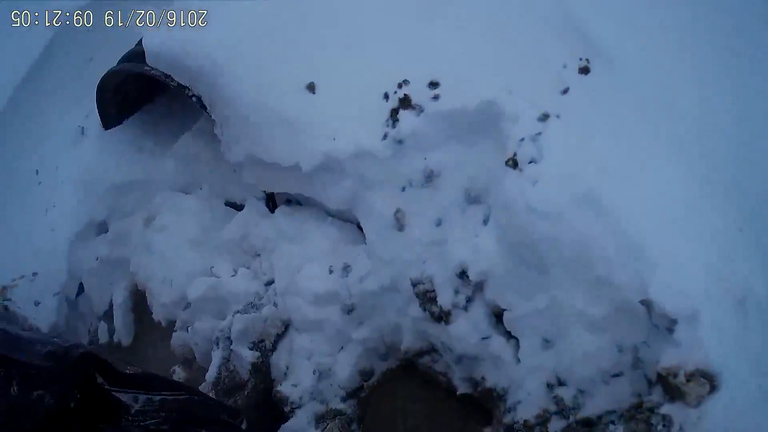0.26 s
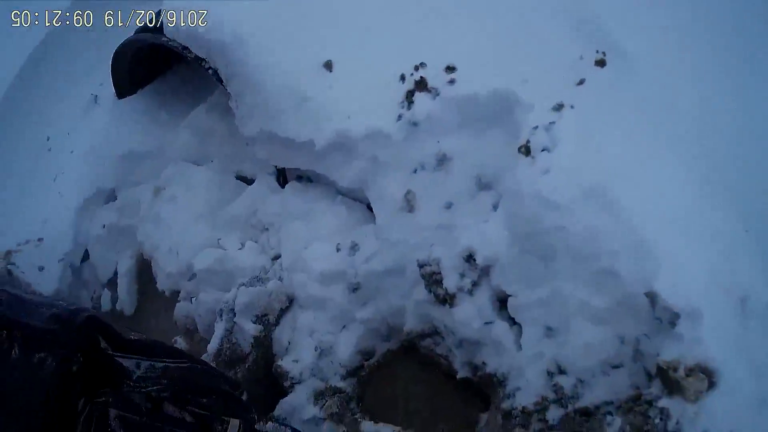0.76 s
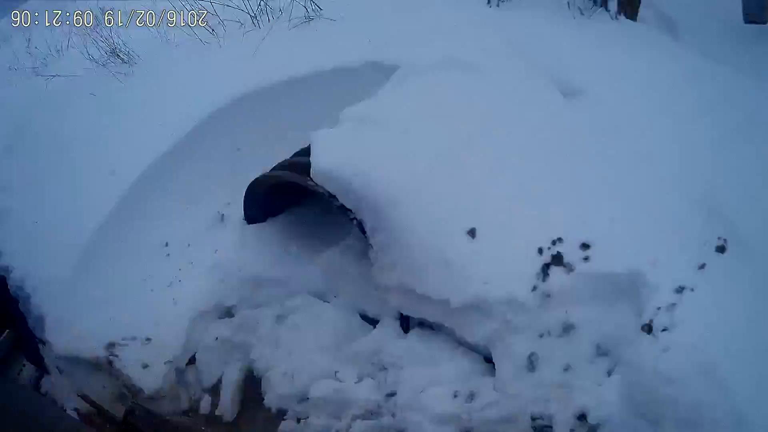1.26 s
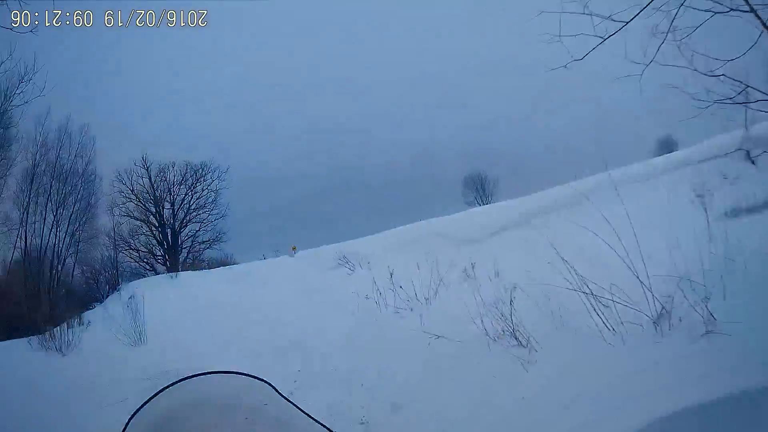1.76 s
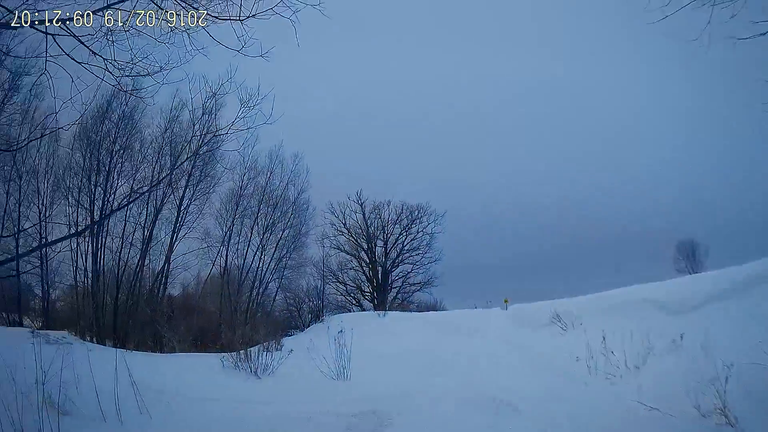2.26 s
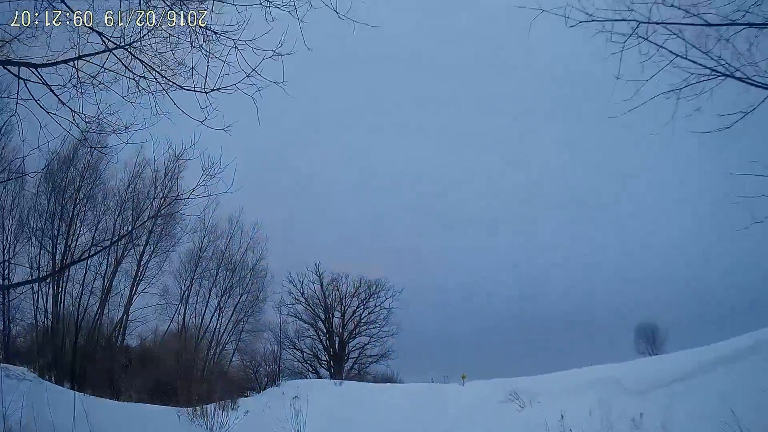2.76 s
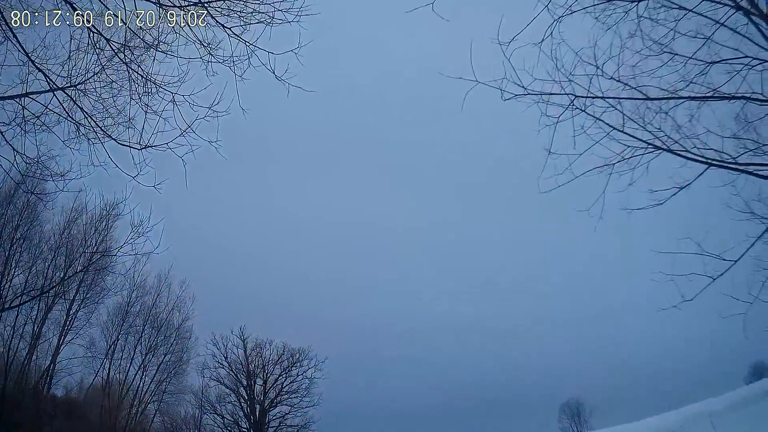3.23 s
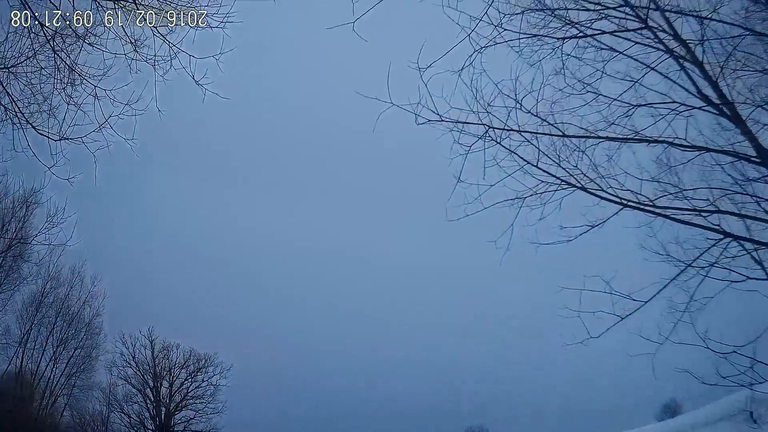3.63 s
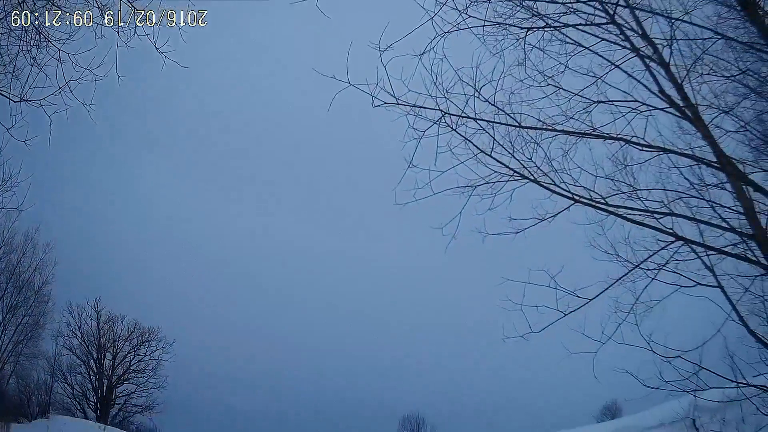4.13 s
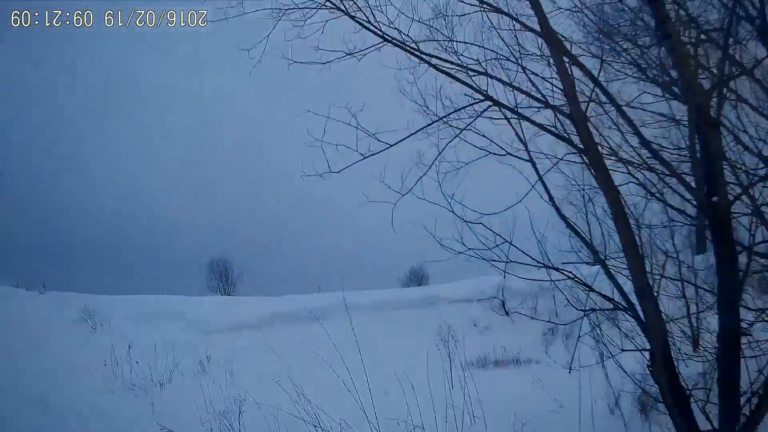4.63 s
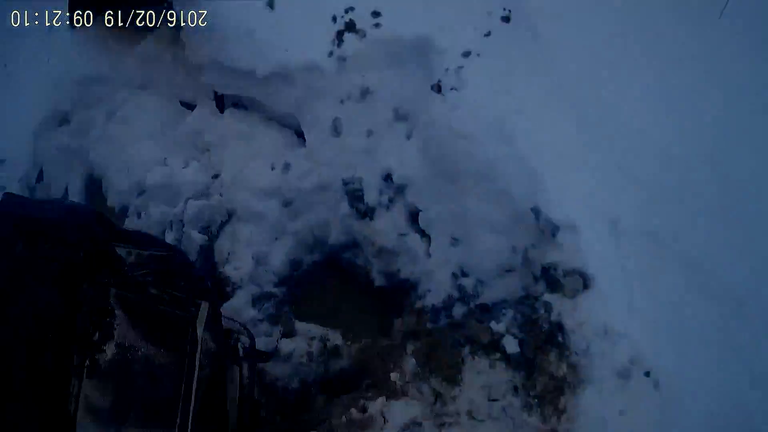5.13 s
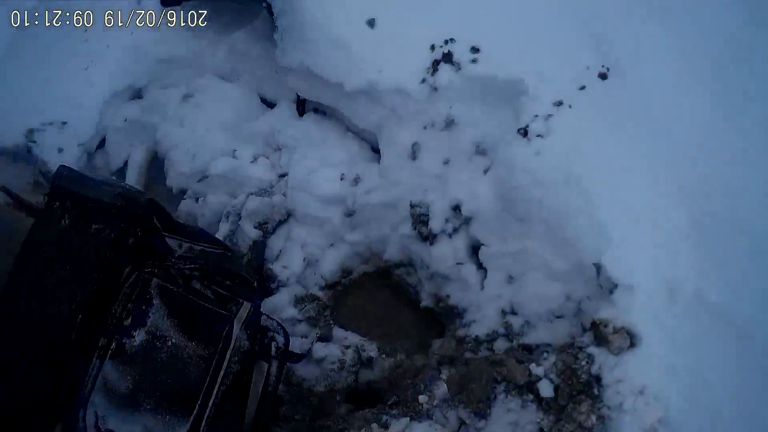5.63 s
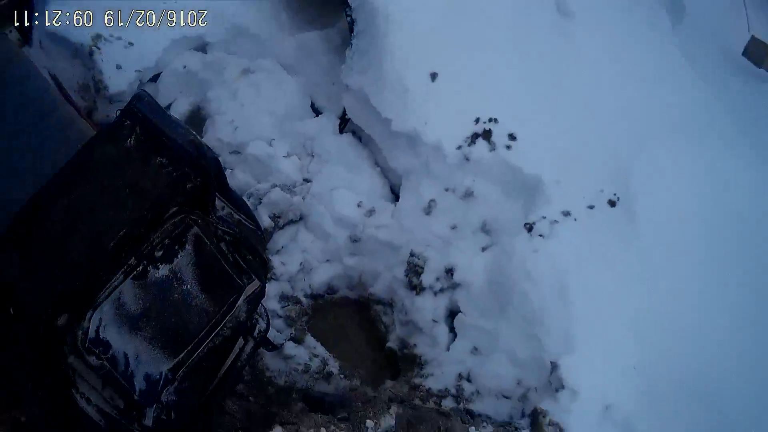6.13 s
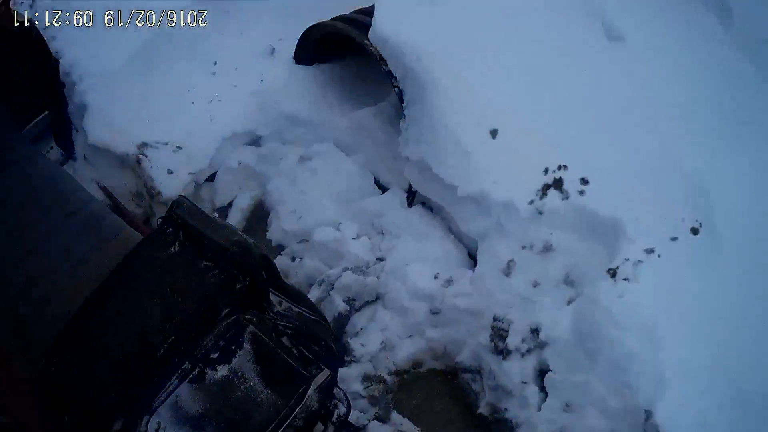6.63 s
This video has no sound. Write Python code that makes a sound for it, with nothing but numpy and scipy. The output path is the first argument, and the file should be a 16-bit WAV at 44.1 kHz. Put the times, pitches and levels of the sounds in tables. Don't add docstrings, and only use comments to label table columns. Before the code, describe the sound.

A close, hollow-sounding microphone in a plastic case catches a small engine's irregular putter: droning exhaust, clustered firings, hissing puffs and buzzing loose parts. A tiny squeak and light pings come first. In the last two seconds, boots and hands crush and scrape snow right nearby, crust crackling, case thumping and one lump of ice striking hard plastic, while the idle continues.

```python
import sys
import numpy as np
from scipy import signal
from scipy.io import wavfile
from scipy.ndimage import uniform_filter1d

SR = 44100
rng = np.random.default_rng(int(sys.argv[2]) if len(sys.argv) > 2 else 0)


def generate_wav(sig):
    pcm = np.round(np.clip(np.atleast_2d(sig).T, -1, 1) * 32767).astype(np.int16)
    wavfile.write(sys.argv[1], SR, pcm)


def how_loud(loudness_db):
    steps = np.asarray(loudness_db, float) / 20
    return 10 ** steps


N = 303849


def evened(x):
    return x / np.sqrt(np.mean(x ** 2) + 1e-20)


def curves(rows, outside=None):
    s, *columns = np.transpose(rows)
    return [np.interp(np.arange(N) / SR, s, column, outside, outside) for column in columns]


def add(mix, s, sound):
    part = mix[max(round(s * SR), 0):][:len(sound)]
    part += sound[:len(part)]


def band_of(x, low_hz, high_hz, order=2):
    return signal.sosfilt(signal.butter(order, (low_hz, high_hz), "band", fs=SR, output="sos"), x)


def around(x, hz, width_hz):
    return evened(band_of(x, hz - width_hz / 2, hz + width_hz / 2))


def boost_db(hz, resonances):
    return sum(db / (1 + (2 * (hz - at) / width) ** 2) for at, width, db in resonances)


# pitch_hz, width_hz, boost_db
CASE_RINGS = [(492.6, 32, 12.5), (931, 47, 12), (1080, 55, 2.5), (1123, 30, 4.5), (1278, 120, -7),
              (2380, 100, -1), (1437, 35, 8), (2200, 316, 7.5), (2830, 160, 9), (3060, 198, 6),
              (5900, 91, 2), (6850, 450, 10.5), (7240, 240, 5), (7360, 130, 5), (8440, 180, 8.5),
              (9580, 270, 12)]


def coloured(x, points, case_share):
    hz = abs(np.fft.fftfreq(8192, 1 / SR))
    f, level_db = np.transpose(points)
    gain_db = np.interp(np.log(hz + 1), np.log(f), level_db, -90, -90)
    gain_db += case_share * boost_db(hz, CASE_RINGS)
    log_gain = np.log(how_loud(np.maximum(gain_db, -90)))
    response = np.fft.ifft(np.exp(np.conj(signal.hilbert(log_gain)))).real[:4096]
    return evened(signal.oaconvolve(x, response)[:N])


def grit(per_s, spread_db):
    size = how_loud(spread_db * np.minimum(rng.exponential(1, N), 4)) * rng.standard_normal(N)
    return evened(size * (rng.random(N) < per_s / SR))


def wander(width):
    return evened(uniform_filter1d(uniform_filter1d(rng.standard_normal(N), width), width))


def patchy(spread_db, width):
    return how_loud(spread_db * wander(width))


def drift(x, spread_db):
    z = signal.stft(x, SR, nperseg=512)[2]
    noise = rng.standard_normal(z.T.shape)
    patches = uniform_filter1d(uniform_filter1d(noise, size=50, axis=0), size=5, axis=1)
    return signal.istft(z * how_loud(spread_db * evened(patches).T), SR, nperseg=512)[1][:N]


# first_s, last_s, catches, bark_db
RUNS = [(.057, .139, 3, -40), (.182, .268, 2, -40), (.313, .36, 2, -44), (.47, .558, 3, -39),
        (.642, .832, 5, -42), (.891, .97, 2, -43), (1.058, 1.101, 2, -38), (1.147, 1.147, 1, -44),
        (1.184, 1.275, 3, -39), (1.322, 1.322, 1, -42), (1.449, 1.535, 2, -42), (1.581, 1.581, 1, -43),
        (1.662, 1.708, 2, -42), (1.787, 1.834, 2, -43), (1.912, 1.912, 1, -40), (2.044, 2.132, 3, -42),
        (2.195, 2.195, 1, -47), (2.28, 2.386, 2, -44), (2.434, 2.475, 2, -48), (2.575, 2.674, 2, -45),
        (2.753, 2.801, 2, -45), (2.87, 2.87, 1, -47), (2.918, 2.918, 1, -41), (2.994, 3.064, 2, -45),
        (3.112, 3.206, 2, -44.5), (3.254, 3.254, 1, -47), (3.373, 3.477, 2, -44), (3.578, 3.657, 2, -46),
        (3.8, 4.045, 3, -46), (3.844, 3.844, 1, -49), (4.12, 4.209, 3, -49), (4.294, 4.294, 1, -45),
        (4.381, 4.475, 3, -46.5), (4.551, 4.643, 2, -46), (4.687, 4.687, 1, -44), (4.851, 4.95, 3, -39),
        (5.003, 5.048, 2, -36.5), (5.13, 5.262, 4, -37), (5.351, 5.351, 1, -37), (5.447, 5.553, 2, -39),
        (5.645, 5.737, 3, -37.5), (5.784, 5.784, 1, -34), (5.867, 5.867, 1, -37), (5.929, 5.929, 1, -35),
        (6.034, 6.034, 1, -34), (6.116, 6.198, 2, -35), (6.275, 6.275, 1, -40), (6.327, 6.471, 4, -38),
        (6.568, 6.568, 1, -39), (6.635, 6.717, 2, -33), (6.76, 6.76, 1, -39), (6.801, 6.844, 2, -35)]
# time_s, pitch_hz, level_db
DRONE = [(0.0, 93.6, -46), (0.4, 96.3, -47.5), (1.11, 96.4, -46), (1.48, 95.4, -46.5), (1.65, 93.1, -45.5),
         (2.05, 94, -46.5), (2.88, 93.3, -46.5), (3.3, 95.9, -46.5), (3.49, 95.1, -47), (4.03, 95.2, -48.5),
         (4.22, 96.4, -48), (4.85, 98, -49.5), (5.03, 97.1, -42), (5.22, 96.2, -45.5), (5.55, 93.65, -46),
         (5.89, 92.8, -42), (6.5, 93.3, -44), (6.89, 91.6, -40)]
# time_s, clatter_db, turned_away (0-1)
HEAD = [(0, -54.5, 0.3), (.38, -53.5, 0.07), (.88, -55, 0), (1.17, -51.5, 0), (1.5, -52, 0.1),
        (1.76, -49, 0.34), (2.15, -50, 0.7), (2.57, -52, 0.69), (2.9, -50, .8), (3.45, -50, 0.8),
        (3.86, -52.5, 0.7), (4.32, -51.5, 0.66), (4.78, -51.5, 0.07), (5.2, -45.5, 0.2), (5.5, -55, 0),
        (5.9, -42.5, 0.29), (6.35, -47.5, 0.55), (6.89, -44, 0)]


def firings():
    after_s, after_db = 0.041, -24
    run_fade_db = -0.63
    bark = np.zeros(N)
    shape = np.sin(np.pi * np.linspace(0, 1, round(.038 * SR)) ** 1.3) ** 2
    for first, last, catches, db in RUNS:
        starts = np.linspace(first, last, round(catches)) - np.argmax(shape) / SR
        for k, s in enumerate(starts):
            catch_db = db + run_fade_db * k
            add(bark, s, how_loud(catch_db) * shape)
            add(bark, s + after_s, how_loud(catch_db + after_db) * shape)
    drone_db, away = curves(DRONE)[1], curves(HEAD)[1]
    return bark, np.tanh(bark / how_loud(drone_db + 5 - 8 * away))


def drone_phase():
    return 2 * np.pi * np.cumsum(curves(DRONE)[0]) / SR


# time_s, share (0-1)
CHOKE_SHARE = [(0, 0.75), (.5, .75), (1.1, 0.58), (1.65, 0.6), (2.1, 0.72), (2.9, 0.52), (3.4, 1),
               (4.05, 0.98), (4.6, 1), (5.2, 0.57), (5.6, 0.64), (6.0, 0.46), (6.89, 0.9)]
# pitch_hz, level_db
RUMBLE = [(15, -24), (30, 0), (45, -5), (75, -1), (120, -18), (160, -9), (220, -11), (270, -15), (330, -21),
          (700, -40)]


def exhaust(bark, catch):
    turn, drone_db, away = drone_phase(), curves(DRONE)[1], curves(HEAD)[1]
    wobble = wander(1500)
    loose = .2 * wobble
    choke = signal.lfilter([.0015], [1, -.9985], catch ** 2)
    choke = np.roll(choke, round(-.008 * SR))
    dip = 1 - np.clip(curves(CHOKE_SHARE)[0], 0, 1.3) * 1.9 * choke
    drone = how_loud(drone_db + 6.0) * dip * np.cos(turn + loose * 1.2)
    weak = how_loud(drone_db - 8.0) * (1 + 0.29 * np.cos(turn / 4 + 3.1 * wobble))
    weak *= 1 - np.clip(1.46 * uniform_filter1d(catch, size=3000), 0, .8)
    octave = (0.76 * bark + weak) * np.cos(2 * turn - 1.2 + loose)
    third_level = 0.11 * (1 - away) * bark + how_loud(drone_db - 22.0 - 23.0 * away)
    third = third_level * np.cos(3 * turn + 0.15 * wobble)
    crank = how_loud(drone_db - 21.0) * np.cos(turn / 2 + 0.27 * wobble)
    crank += how_loud(drone_db - 12) * dip * np.cos(3 * turn / 4 - 1.5 * wobble)
    crank += how_loud(drone_db - 10.5) * (0.44 + catch) * np.cos(3 * turn / 2 + 0.6 * wobble)
    rumble = coloured(rng.standard_normal(N), RUMBLE, 0.56) * (1 + .5 * catch)
    rumble *= how_loud(-51 + 1.4 * (drone_db + 44.0) - 4.0 * away)
    return drone + octave + third + crank + rumble


# start_s, end_s, pitch_hz, width_hz, level_db (over the clatter)
HOLLOWS = [(5.65, 8.5, 1570, 84, -8), (3.5, 4.8, 6500, 160, -17), (5.1, 7.1, 3700, 150, -19),
           (1.55, 2.04, 5040, 900, -15), (1.55, 3.7, 8400, 800, -15), (3.6, 4.8, 5950, 200, -18),
           (4.4, 4.8, 2000, 500, -12), (4.5, 4.8, 3800, 700, -14), (2.4, 4.6, 700, 150, -21),
           (1.9, 3.1, 5600, 300, -19), (-.2, 1.4, 3900, 400, -15), (1.52, 2.08, 5900, 900, -13),
           (2.1, 3.5, 11900, 900, -23), (1.55, 4.8, 6900, 300, -13), (1.55, 4.8, 7500, 200, -19),
           (-.2, 1.9, 1165, 80, -9), (-.2, 1.5, 2740, 110, -9), (-.2, 1.5, 1960, 90, -21),
           (5.25, 5.65, 2950, 200, -8)]


def hollows():
    t, out = np.arange(N) / SR, np.zeros(N)
    for start, end, hz, width, db in HOLLOWS:
        pose = np.clip(np.minimum(t - start, end - t) / 0.24, 0, 1)
        out += how_loud(db) * pose * around(rng.standard_normal(N), hz, width)
    return how_loud(curves(HEAD)[0]) * out


# pitch_hz, level_db (per Hz)
DULL = [(180, 4), (300, -13.5), (415, -13), (515, -14.5), (1030, -10), (1150, 0.5), (1330, -3),
        (1480, -6.5), (2000, -16), (2600, -47), (4400, -120)]
BRIGHT = [(1060, -28), (1900, -15.5), (2630, 1.5), (3250, -3.5), (3520, -11.5), (5800, -14.5), (6950, -7),
          (7750, -10), (9700, -13.5), (15500, -16)]
GAP = [(3400, -30), (3800, -3), (4900, 0), (5400, -6), (6000, 1), (6400, -8), (6700, -30)]
# pitch_hz, level_db (per Hz)
HISS = [(2000, -45), (6000, -19), (11000, -13), (15500, -28)]


def clatter(catch):
    clatter_db, away = curves(HEAD)
    rattle = [patchy(1.7, 300) * rng.standard_normal(N) + .55 * grit(700, 3.5) for _ in range(3)]
    dull = how_loud(clatter_db - 5 - 6.5 * away) * coloured(rattle[0], DULL, 0.89) * (1 + 0.52 * catch)
    bright = how_loud(clatter_db - 3) * coloured(rattle[1], BRIGHT, 0.89) * (1 + 0.74 * catch ** 2.26)
    gap = how_loud(clatter_db - 13.5 + 0.4 * away) * coloured(rattle[2], GAP, 0.58) * (1 + 0.39 * catch)
    puffs = how_loud(clatter_db - 9.5) * catch ** 1.5 * coloured(rattle[0], HISS, 1.0)
    ringing = (1 + 0.18 * catch) * hollows()
    turn = drone_phase()
    strokes = 1 + 0.017 * np.cos(turn) + 0.02 * np.cos(turn / 4)
    return ringing + puffs + drift(dull + bright + gap, 0.69) * strokes


def engine():
    bark, catch = firings()
    return exhaust(bark, catch) + clatter(catch)


def microphone_hiss():
    return how_loud(-83) * coloured(rng.standard_normal(N), HISS, 0)


# start_s, length_s, slip_rate_hz, then rows of multiple, level_db
SQUEAK = (1.23, .078, 3368, [(2, -52), (3, -65), (4, -62)])


def squeak():
    s, length, hz, multiples = SQUEAK
    t, out = np.arange(round(length * SR)) / SR, np.zeros(N)
    waver, grip = (evened(uniform_filter1d(rng.standard_normal(len(t)), size=90)) for _ in range(2))
    turn = 2 * np.pi * np.cumsum(hz * (1 + .03 * np.exp(-t / .005) + .008 * waver)) / SR
    slips = sum(how_loud(db) * np.cos(k * turn) for k, db in multiples) * (1 + .3 * grip)
    add(out, s, slips * signal.windows.tukey(len(t), .2))
    return out


# start_s, peak_db
PINGS = [(1.78, -38), (1.9065, -36), (2.7909, -39), (2.8346, -47), (3.7932, -36.5), (3.9165, -39),
         (4.564, -42), (5.4308, -39), (5.4365, -39), (6.7781, -27)]
# start_s, peak_db, pitch_hz, length_ms
SNAPS = [(4.8628, -27, 3480, 1.5), (4.8982, -23, 5800, 1.8), (4.9318, -18, 5200, 1.2),
         (4.948, -18, 4500, 1), (4.9911, -18, 5470, 1.5), (5.0072, -20, 6500, 1.8), (5.0158, -12, 4700, 3),
         (5.8758, -25, 7415, 1.3), (5.889, -25, 7460, 1.2), (5.957, -19, 2000, 1.5),
         (5.9638, -14, 2200, 2.3), (5.9724, -20, 7500, 0.95), (5.9955, -26, 5500, 2.3),
         (6.0442, -23, 8500, 1.2), (6.6155, -10.5, 5480, 2.4), (6.6215, -3, 4550, 0.56),
         (6.7072, -25, 3220, 2), (4.9187, -16, 4760, 3.9), (4.9762, -19, 5300, 1.06),
         (4.998, -16, 4600, 2.6), (5.0022, -19, 6200, 1.7), (5.0128, -12, 4100, 1.7),
         (5.0555, -24, 3600, 0.59), (5.0657, -20.5, 4350, 2.5), (5.082, -25, 5600, 1.8),
         (5.1345, -27, 2000, 2), (5.522, -20, 6173, 2), (5.5505, -28.5, 3878, 1.56),
         (5.7074, -19.5, 4930, 3.3), (5.7515, -24, 4430, 2.1), (5.8084, -25.5, 4500, 1.1),
         (5.8445, -21, 4330, 1.9), (5.8666, -23, 6400, 2.9), (5.8801, -14.5, 4200, 2.8),
         (5.8941, -16, 5900, 1.3), (5.8982, -14.5, 6150, 1.8), (5.9757, -14, 5900, 2.87),
         (5.9804, -7.5, 5260, 2), (6.0814, -19, 4700, 1.6), (6.1384, -23, 6090, 0.8),
         (6.251, -19, 4905, 2.6), (6.33, -2, 6124, 2.4), (6.5852, -12.5, 5000, 2), (6.589, -21, 5700, 1.6),
         (6.613, -16, 4380, 3.4), (6.6192, -5, 4350, 1)]
# start_s, peak_db, pitch_hz
CRUMBS = [(5.596, -40, 5000), (5.7325, -33, 9000), (5.7835, -32, 7000), (5.8312, -35, 7500),
          (5.9092, -15, 5500), (5.9134, -26, 5500), (5.941, -18, 5970), (6.0103, -15, 3200),
          (6.671, -14.5, 5500), (6.6825, -24, 4500), (6.7956, -32, 5000), (5.029, -28, 3750),
          (5.094, -26, 7300), (5.125, -27, 3305), (5.1696, -34, 5340), (5.1838, -26, 5470),
          (5.3111, -36, 4450), (5.3938, -36.5, 6450), (5.761, -27.5, 4630), (6.07, -26, 8900),
          (6.187, -33, 6900), (6.3669, -35, 4460), (6.4351, -41, 5900), (6.4726, -28.5, 4530),
          (6.516, -35, 6500), (4.625, -36, 2300), (5.508, -41, 8000), (5.203, -36, 4500),
          (5.536, -38, 5980), (6.532, -30.5, 6100), (6.571, -27, 6000), (6.5928, -33, 3800),
          (6.605, -22, 7000)]
# pitch_hz, level_db
FLAT = [(20, 0), (20000, 0)]


def snaps():
    t, out = np.arange(1300) / SR, np.zeros(N)
    crumb_ms, ping_hz, ping_ms, ping_octaves = 1.3, 3350, 3.2, -.08
    breaks = SNAPS + [(*row, crumb_ms) for row in CRUMBS]
    rows = [(*row, 0.82 + .012 * (row[1] + 20)) for row in breaks]
    rows += [(*row, ping_hz, ping_ms, ping_octaves) for row in PINGS]
    noise = rng.standard_normal((len(rows), len(t)))
    noise[:, 20] += 3.3 * how_loud(-0.2 * (np.array(rows)[:, 1] + 10))
    noise = coloured(np.resize(noise, N), FLAT, 0.77)[:noise.size].reshape(noise.shape)
    for (s, db, hz, ms, octaves), crackle in zip(rows, noise):
        low_hz, high_hz = 0.75 * hz / 2 ** octaves, min(hz * 2 ** octaves, SR / 3)
        fade = np.exp(-(1000 * t / max(ms, .3)) ** 1.5) + 0.071 * np.exp(-t / 0.005)
        puff = crackle * fade * (1 - np.exp(-t / 0.000043))
        core = band_of(puff, low_hz, high_hz, order=3)
        skirt = band_of(puff, low_hz, 14000)
        burst = evened(core) + .18 * evened(skirt)
        add(out, s, how_loud(db) * burst / abs(burst).max())
    return out


# pitch_hz, level_db
CARD_BANDS = [(9750, -68), (11900, -71), (13150, -70)]


def card():
    first_s, length_s, ticks_hz, width_hz = 3.17, .2, 85, 400
    t = np.arange(N) / SR
    ticks = np.diff(np.floor(t * ticks_hz), prepend=0) * (1 + rng.random(N))
    buzz = sum(how_loud(db) * around(ticks, hz, width_hz) for hz, db in CARD_BANDS)
    return buzz * (t > first_s) * ((t - first_s) % 1 < length_s)


# start_s, level_db
TAPS = [
    (3.4041, -38),
    (4.016, -29.5),
    (4.793, -29.5),
]
# pitch_hz, level_db, fade_s (to -60 dB)
PLASTIC = [(1331, -1.5, 0.019), (1770, -5, 0.011), (2270, 6.5, 0.0099), (3000, 5, 0.0066),
           (3730, -2, 0.0079), (4940, -6, 0.0074), (5800, -5, .006), (6560, -5, 0.0076)]
# start_s, level_db, slope_db (per half octave away from the middle)
CLACKS = [
    (6.33005, 3, 0),
    (6.3378, -13, -3),
]
# pitch_hz, level_db, fade_s (to -60 dB)
CLACK_MODES = [(420, -29, 0.0075), (936, -25, 0.0068), (1420, -17, 0.0051), (2300, -10, 0.0056),
               (3200, -8.5, 0.0089), (4220, -4, .004), (5000, 5, 0.0033), (5590, 4, 0.0039),
               (6350, -8, 0.0045), (7400, -1, 0.004), (8270, -4.5, 0.0054), (9670, -7, .004),
               (12100, -16, 0.0033), (14000, -17, .003)]


def knocks():
    t, out = np.arange(1500) / SR, np.zeros(N)
    ring = sum(how_loud(db - 60 * t / fade_s) * np.sin(2 * np.pi * hz * t) for hz, db, fade_s in PLASTIC)
    for s, db in TAPS:
        add(out, s, how_loud(db) * ring * (1 - np.exp(-t / 0.0009)))
    middle_hz, spread_s, rise_s = 5000, 0.00091, 0.00028
    for s, db, slope_db in CLACKS:
        for k, (hz, mode_db, fade_s) in enumerate(CLACK_MODES):
            late_s = spread_s * np.clip(np.log2(2 * middle_hz / hz) / 2, 0, 1.1)
            u = np.maximum(t - late_s, 0)
            level_db = db + mode_db + slope_db * abs(np.log2(hz / middle_hz)) * 2 - 60 * u / fade_s
            rise = (1 - np.exp(-u / rise_s)) ** 2
            add(out, s, (-1) ** k * how_loud(level_db) * rise * np.sin(2 * np.pi * hz * t))
    return out


# time_s, force_db, crust_db (crust spreads low and high, sliding is narrow)
CRUSH = [
    [(4.79, -42, 0), (4.805, -35, 6), (4.835, -32, -1), (4.915, -29, 5), (4.965, -36.5, 2.5),
     (5.005, -30.5, 3), (5.04, -43, 6), (5.2, -52.5, -6), (5.3, -68, -9)],
    [(5.5, -52, -17), (5.55, -39, -6), (5.6, -55, -5), (5.655, -44.5, 1), (5.72, -39, -6), (5.8, -42.5, 3)],
    [(5.8, -41.5, 1), (5.87, -49, -14), (5.91, -30.5, -3), (5.96, -27.5, 6.5), (5.982, -22.5, -4),
     (5.995, -21.5, -0.5), (6.05, -30, 0), (6.12, -39.5, -4), (6.3, -46.5, -6), (6.5, -61, -7)],
    [(6.54, -65, -4), (6.583, -44, 8), (6.592, -34, 9), (6.603, -37, -7), (6.62, -26.5, 9.5),
     (6.634, -31, -3), (6.68, -21, -8), (6.745, -23, -14.5), (6.756, -41, -1), (6.78, -54, -4)],
    [(6.79, -40, -10), (6.82, -32, -12), (6.86, -37, -17), (6.89, -35, -18)],
]
STROKE_PLACE = (0, 1, 1, 2, 2)
PLACE_FIZZ_DB = (0.5, 0.7, 2)
# pitch_hz,
# width_hz, boost_db (negative for a dip)
PLACE_RINGS = [
    [(1005, 75, 4), (3800, 450, 4.5), (5880, 140, 9), (7000, 400, 3.5), (11520, 4800, -1.5),
     (13150, 250, -10)],
    [(1552.5, 63, 7.5), (4100, 1100, -3.5), (13900, 1200, 2), (13100, 300, -10), (11500, 2000, -1.5)],
    [(1505, 200, 11.5), (4700, 280, 5), (5900, 180, 8), (13700, 900, 6), (13100, 300, -10)],
]
# pitch_hz, level_db (per Hz)
SNOW = [(120, -13), (200, -13), (630, -21.5), (906, -7.5), (1450, -5.5), (1840, -4.5), (3070, 0),
        (4200, -2), (5390, -3.5), (6960, -2), (9500, -9), (14200, -18), (15500, -21)]


def crush():
    breaking = rng.standard_normal(N) + .55 * grit(2500, 1.6)
    grains = coloured(evened(patchy(0.78, 110) * breaking), SNOW, 0.35)
    hz, t, z = signal.stft(grains, SR, nperseg=256, noverlap=192)
    noise = rng.standard_normal(z.T.shape)
    patches = evened(uniform_filter1d(uniform_filter1d(noise, size=20, axis=0), size=6, axis=1)).T
    low, fizz = 1 / (1 + (hz / 1900) ** 6), 1 / (1 + (4000 / (hz + 1)) ** 6)
    gain = np.zeros(z.shape)
    for rows, place in zip(CRUSH, STROKE_PLACE):
        s, *columns = np.transpose(rows)
        force_db, crust_db = (np.interp(t, s, column, -90, -90) for column in columns)
        low_db = 3 + 0.89 * crust_db
        fizz_db = -4.5 + PLACE_FIZZ_DB[place] + 0.5 * crust_db
        ring_db = boost_db(hz, PLACE_RINGS[place])[:, None]
        gain += how_loud(force_db + np.outer(low, low_db) + np.outer(fizz, fizz_db) + ring_db)
    uneven = how_loud(3.0 * patches)
    return how_loud(-0.5) * signal.istft(z * gain * uneven, SR, nperseg=256, noverlap=192)[1][:N]


# start_s, end_s, pitch_hz, width_hz, level_db
RASPS = [(4.793, 4.853, 3000, 300, -38), (4.83, 4.94, 5880, 130, -35), (4.819, 4.94, 7020, 300, -38.5),
         (4.86, 4.93, 3800, 300, -36), (4.989, 5.001, 2880, 350, -30), (5.93, 6.045, 1470, 150, -37.5),
         (5.979, 6.038, 7000, 300, -35), (5.987, 6.047, 3100, 250, -34.5), (6.628, 6.662, 3050, 200, -36),
         (6.697, 6.752, 3000, 250, -33.5)]


def rasps():
    out = np.zeros(N)
    for start, end, hz, width, db in RASPS:
        u = np.linspace(0, 1, round((end - start) * SR))
        slips = rng.standard_normal((2, 6000))[:, :len(u)]
        bite = np.sin(np.pi * u ** 1.4) * how_loud(1.8 * evened(uniform_filter1d(slips[1], size=200)))
        add(out, start, how_loud(db) * bite * around(slips[0], hz, width))
    return out


# start_s, peak_db, direction (-1 to 1), length_ms, buzz_hz
BUMPS = [(4.793, -15.5, 0.68, 6.3, 890), (4.818, -26, -0.84, 18, 927), (4.895, -30, -1, 13, 920),
         (4.919, -41, 0.83, 36, 1010), (5.951, -34, 0.57, 19, 625), (6.574, -38.5, 0.73, 19.7, 490),
         (6.603, -30, -0.83, 11, 526), (6.621, -25, 0.054, 17, 526)]


def bumps():
    out, t = np.zeros(N), np.arange(5000) / SR
    for s, db, direction, ms, buzz_hz in BUMPS:
        u = 3000 * t / ms
        push = u * np.exp(1 - u) * (1 + 0.38 * np.cos(2 * np.pi * buzz_hz * t))
        sag = 0.097 * u / 4 * np.exp(1 - u / 4)
        add(out, s, direction * how_loud(db) * (push - sag))
    return out


def scene():
    machine = microphone_hiss() + engine()
    snow = crush() + rasps() + snaps()
    case = bumps() + knocks() + squeak() + card()
    return np.tile(machine + snow + case, (2, 1))


def roll_off(x):
    return signal.sosfilt(signal.butter(12, 16400, fs=SR, output="sos"), x)


def record(dry):
    full = dry / (1 + (dry / .62) ** 8) ** (1 / 8)
    limited = signal.oaconvolve(full, signal.firwin(255, 15100, fs=SR)[None], "same")
    leak = signal.oaconvolve(full - limited, signal.firwin(63, 15900, fs=SR)[None], "same")
    limited += how_loud(-24) * leak
    return roll_off(limited)


dry = scene()
out = record(dry)
generate_wav(out)
```